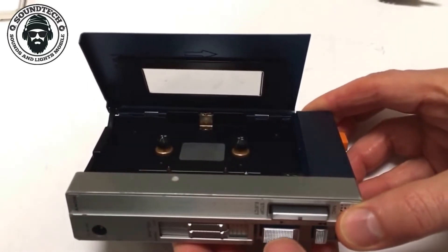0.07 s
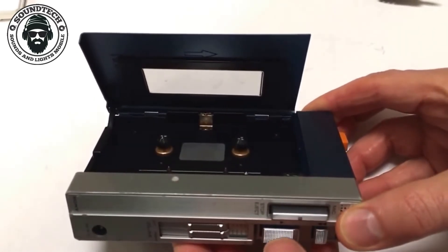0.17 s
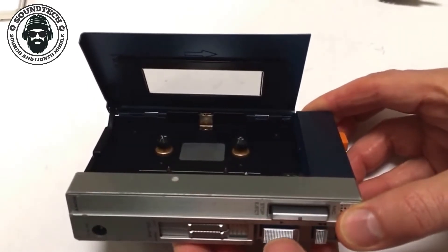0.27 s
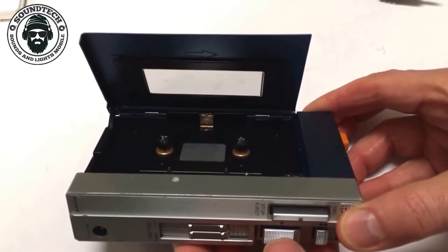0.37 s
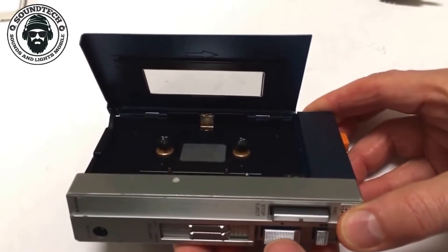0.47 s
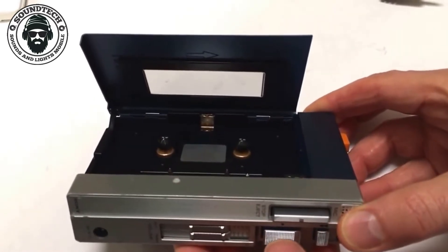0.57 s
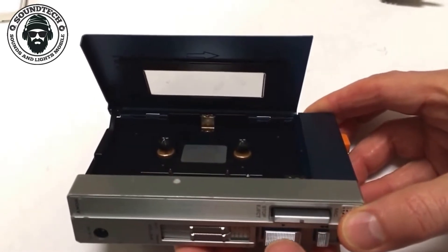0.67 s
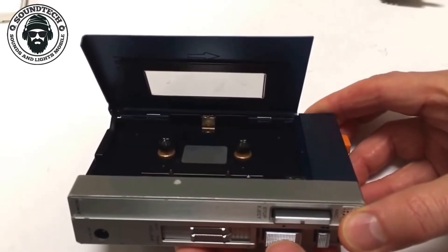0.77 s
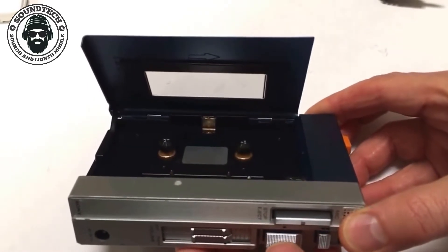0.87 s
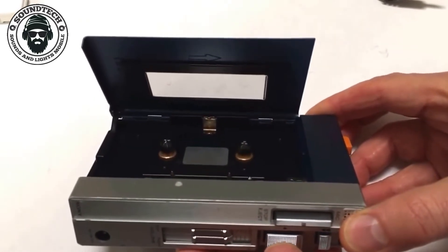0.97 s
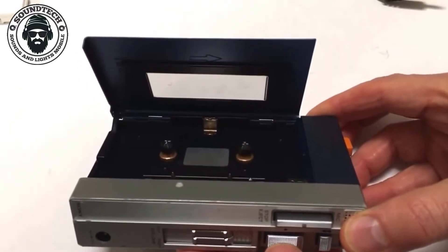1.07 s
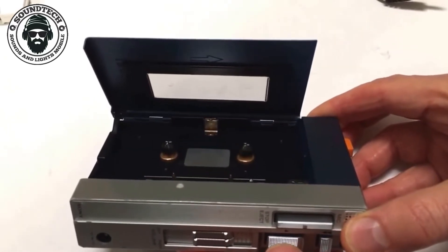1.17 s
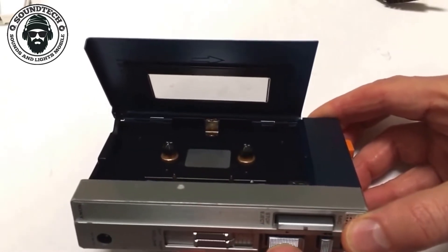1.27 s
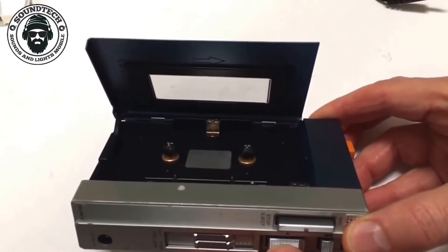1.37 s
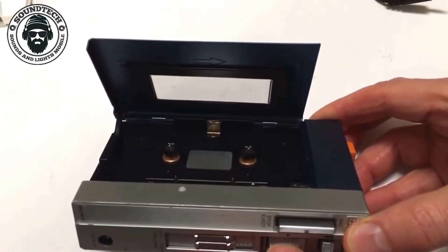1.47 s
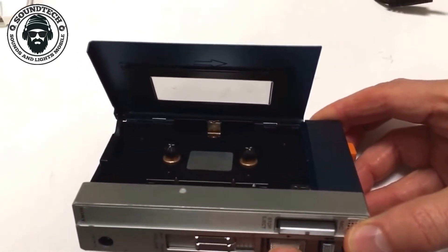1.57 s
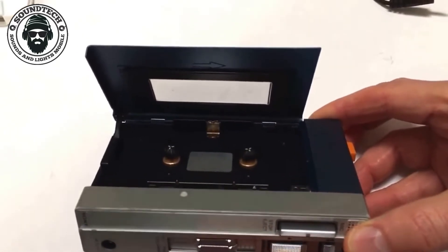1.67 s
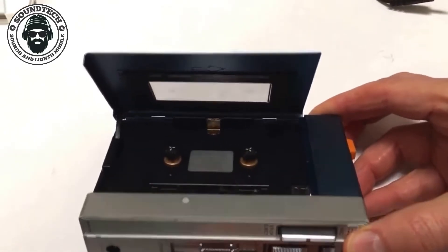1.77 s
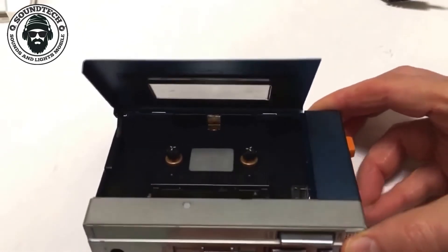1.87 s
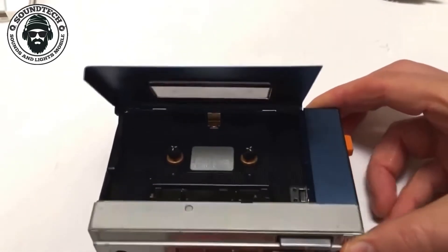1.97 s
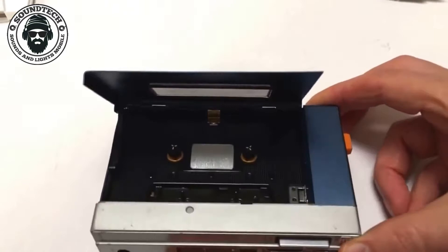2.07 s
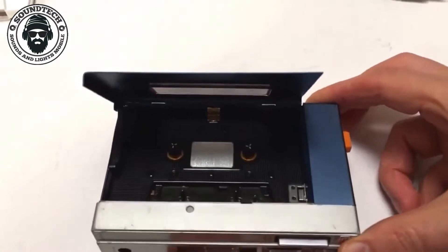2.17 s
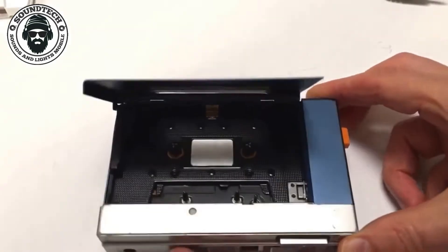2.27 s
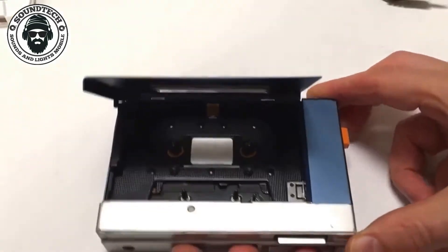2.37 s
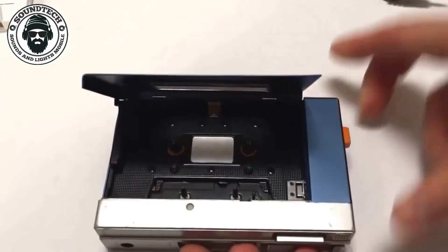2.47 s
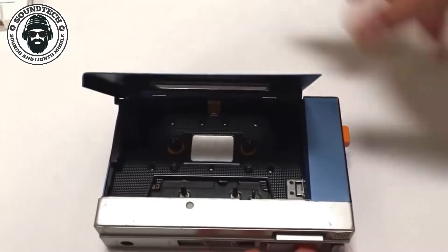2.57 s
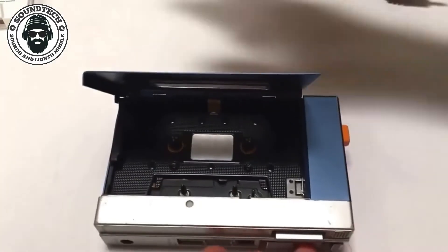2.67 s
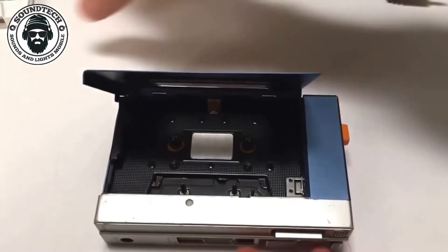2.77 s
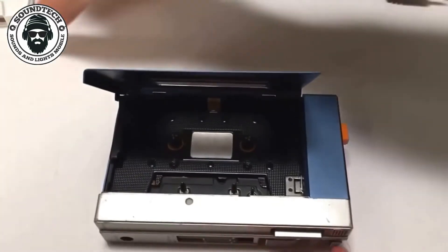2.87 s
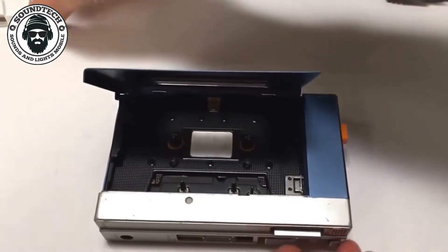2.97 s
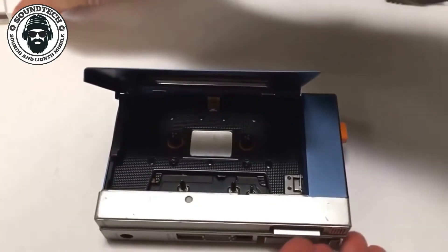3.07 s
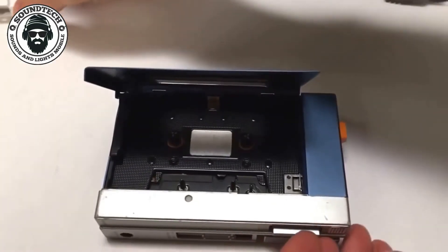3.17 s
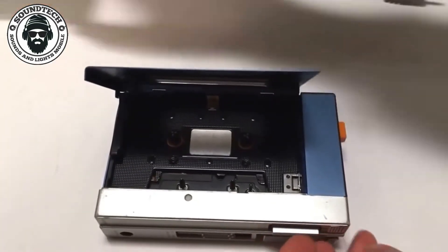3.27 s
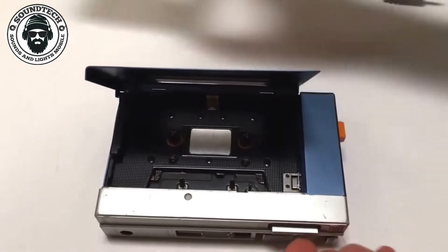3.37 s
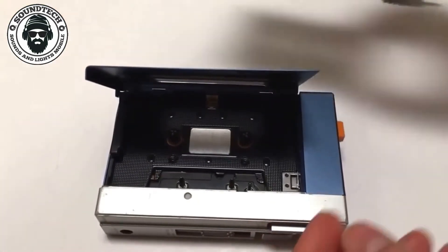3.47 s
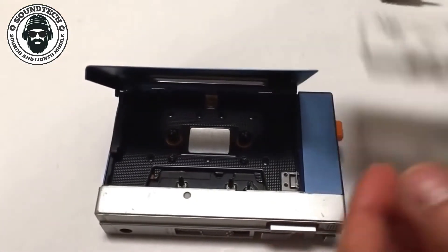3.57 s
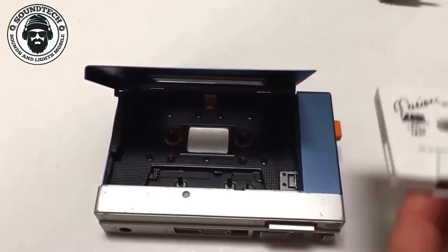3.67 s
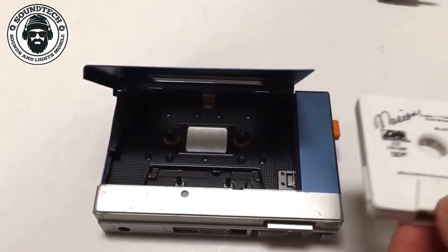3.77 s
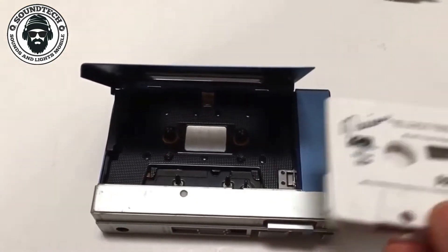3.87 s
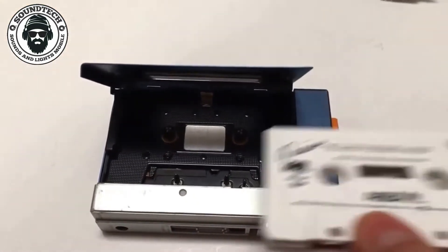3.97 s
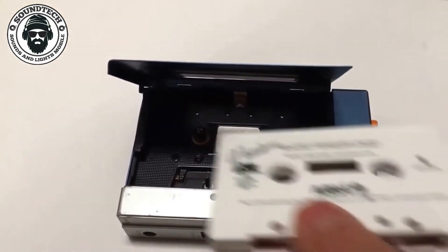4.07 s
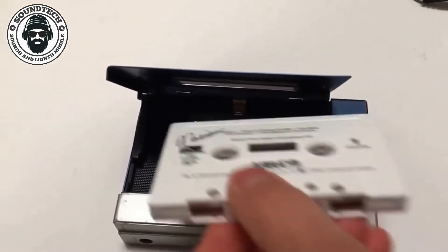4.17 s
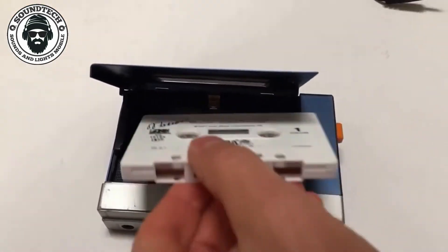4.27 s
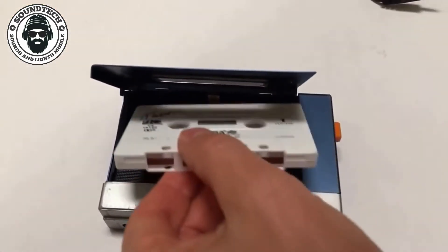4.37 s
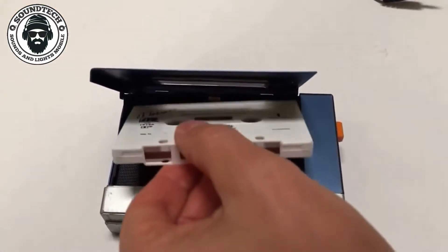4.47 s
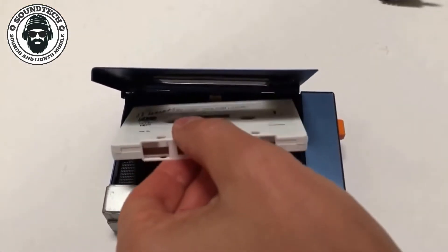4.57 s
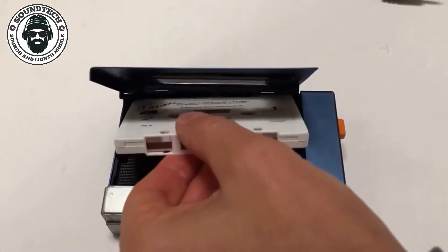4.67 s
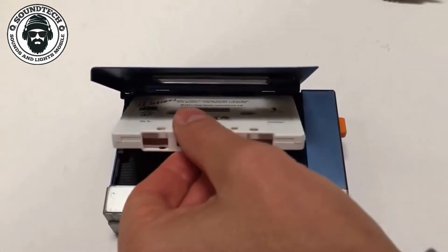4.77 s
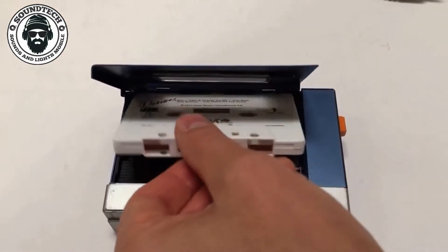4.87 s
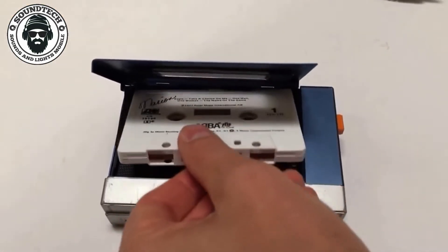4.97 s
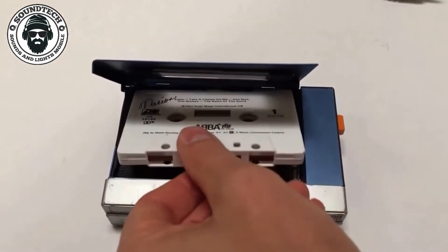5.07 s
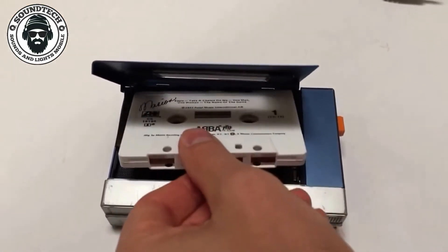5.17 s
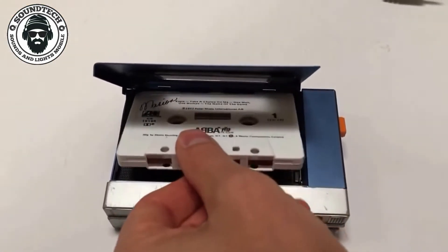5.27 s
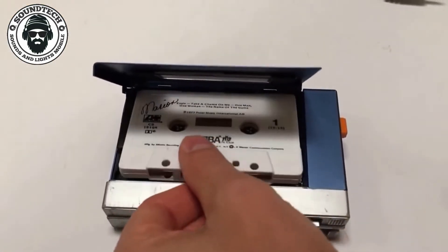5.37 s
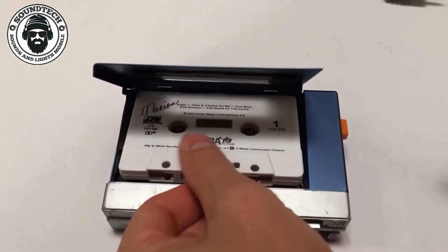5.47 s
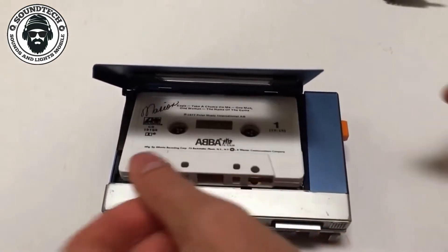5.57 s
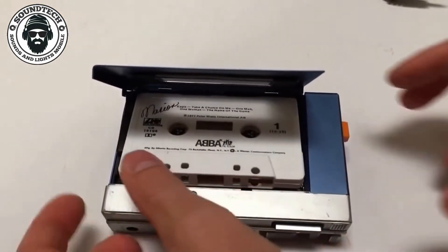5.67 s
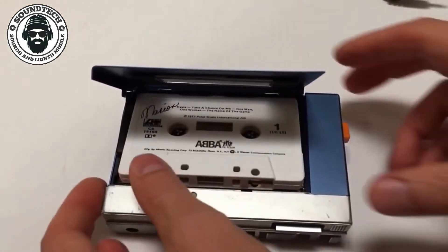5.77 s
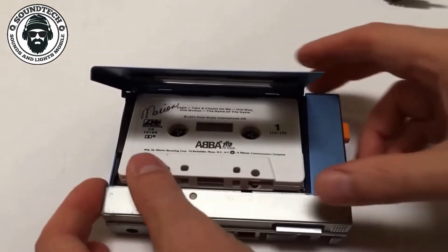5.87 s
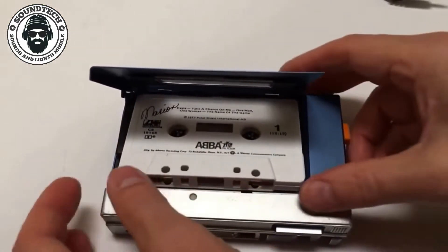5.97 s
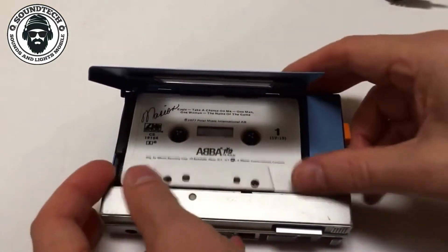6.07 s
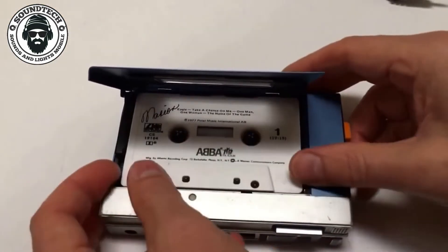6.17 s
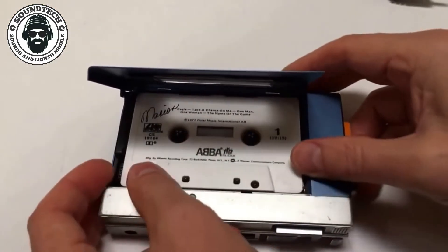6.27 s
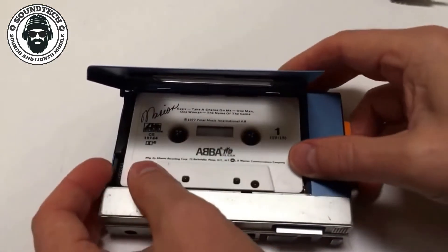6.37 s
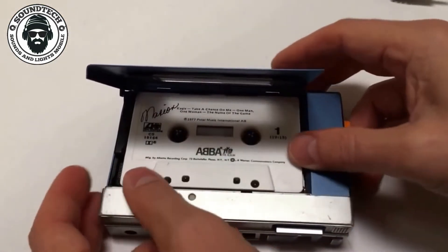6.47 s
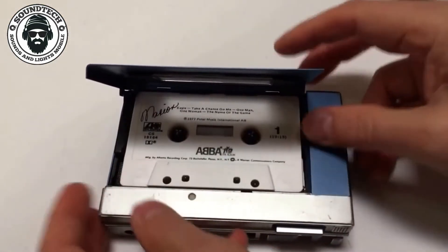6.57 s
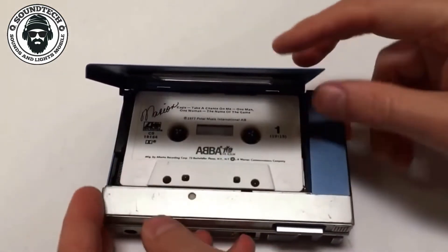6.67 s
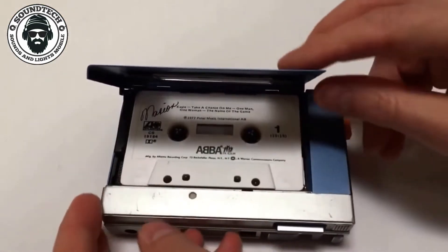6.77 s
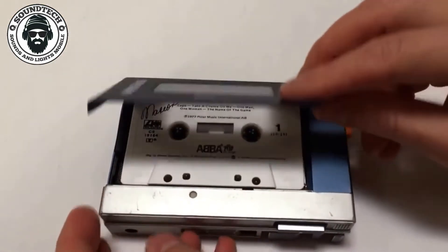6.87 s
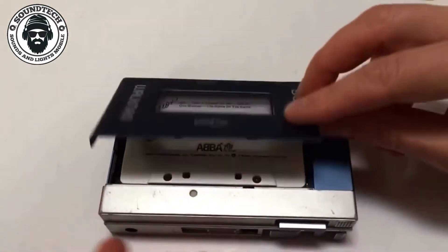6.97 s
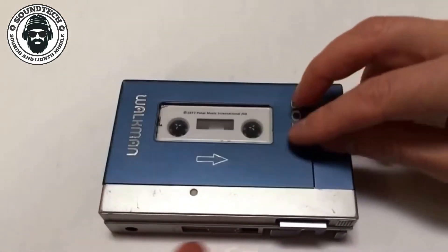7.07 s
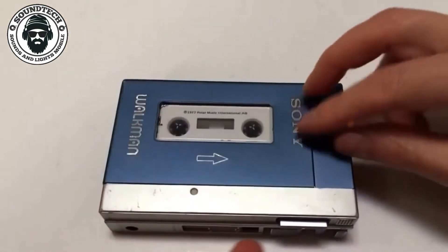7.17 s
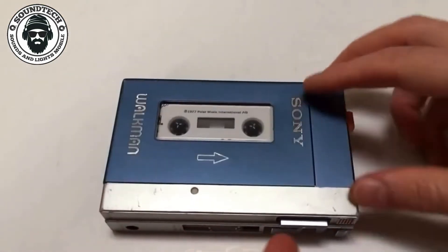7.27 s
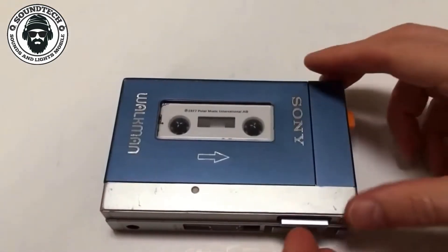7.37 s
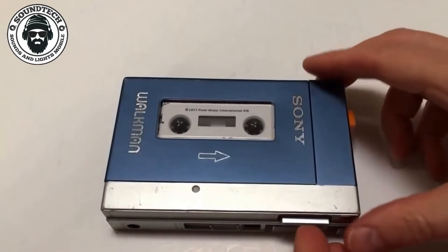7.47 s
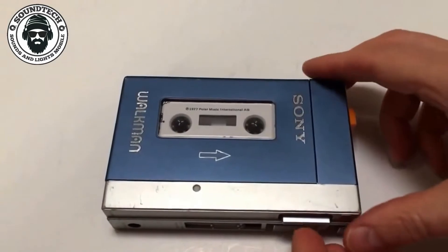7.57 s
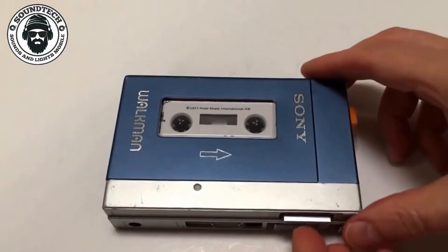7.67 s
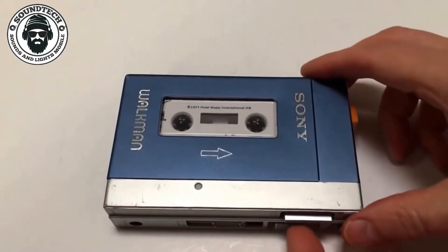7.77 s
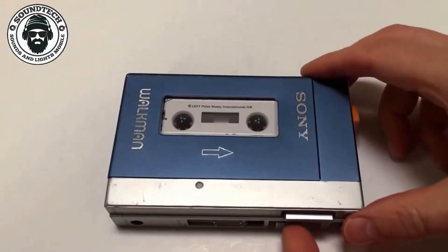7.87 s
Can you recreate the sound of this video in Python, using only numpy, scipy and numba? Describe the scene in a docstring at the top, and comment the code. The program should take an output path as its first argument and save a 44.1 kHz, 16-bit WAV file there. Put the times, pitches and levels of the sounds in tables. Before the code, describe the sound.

In a small quiet room, close to the microphone, a little cassette motor whirrs faintly, a grainy, buzzing gear tone with a slight fast flutter. At about 1.5 seconds a stop key snaps back, loud and bright, and the whirr ceases at once. Soft finger rubs and low bumps follow, then a firm plastic knock at 2.3 as the player is set down. Small thumps and faint rustles come around 3, then near quiet until 4. From 4.35 to 4.9 a cassette clacks and rattles hollowly into the bay; at 5.4 a tight burst of crisp clicks seats it. A short scrape leads to a loud press click at 6.1, with a lesser one at 6.5. The lid shuts at 7.1 with the strongest late snap and a short room echo. Faint rubs and taps finish over soft rumble and hiss.

```python
"""A small room, with a portable cassette player on a table close to one microphone. Its motor whirrs until the
stop key snaps back; it is set down, a cassette is slid in and pressed home, and the lid is shut.
The whirr is gear ticks and brush noise ringing the chassis. Every click is a short chatter of contacts that
rings the shell and stirs the room. Grainy noise makes the fingers rubbing on plastic; soft rumble and
hiss lie under it all."""
import sys
import numpy as np
from scipy import signal
from scipy.io import wavfile
from scipy.ndimage import uniform_filter1d
from numba import njit

SR = 44100
rng = np.random.default_rng(int(sys.argv[2]) if len(sys.argv) > 2 else 0)


def transcribe(u):
    """Save the signal u as a 16-bit wav file named by the first command-line argument.

    u: samples, shape (n,) or (channels, n), limited to [-1, 1]; the rate is SR.
    q: integer samples, one column per channel.
    """
    v = np.clip(np.atleast_2d(u).T, -1, 1)
    q = np.round(v * 32767).astype(np.int16)
    wavfile.write(sys.argv[1], SR, q)


N = 349272

# Clicks: t/s, peak before the echo/dB, thud (how much it shakes the table)/dB, snap (how hard the contact is)/dB,
# low pitch of the struck part f/Hz, its high pitch f/Hz, chatter length/ms
CLICKS = [(1.467, -4.5, -15, 5, 1736, 8030, 6.5), (1.472, -16, -10.5, -1.5, 1940, 8530, 3.8),
          (1.656, -41, -4, -3.5, 1680, 6280, 12), (1.678, -25.5, -21.5, -7, 1650, 4240, 7),
          (1.763, -47, 22, -7, 996, 3410, 15), (1.965, -50, 11, -5, 1450, 3520, 5.6),
          (2.013, -41, 37, -3, 1460, 3290, 5.3), (2.034, -42.5, 26, -9, 1460, 7170, 5.3),
          (2.052, -47, 6, -6, 1220, 6610, 20), (2.083, -39.5, 0, -6, 1250, 3590, 1.6),
          (2.284, -29.5, 0, -5, 1180, 3740, 11), (2.291, -15, 14.5, 0, 1190, 4130, 5.7),
          (2.325, -21.5, 1.5, -5.5, 897, 3200, 4.5), (2.351, -33, -10, 7, 970, 4130, 11),
          (2.368, -41.5, 2, -3, 956, 3610, 12), (2.437, -39, 8, 8, 1950, 4190, 2.8),
          (2.446, -37, -5, -4, 2090, 3360, 7.5), (2.8, -43, -23, -5.5, 1690, 3620, 11.4),
          (2.935, -50.5, 6, -7, 1190, 3950, 12), (2.996, -43.5, 22, -9, 1710, 3820, 9.6),
          (3.027, -32.5, 35, 7, 1030, 3680, 7.7), (3.044, -39, 14, -3, 1310, 4030, 19),
          (3.09, -43.5, 19, 1, 1710, 3330, 5.4), (3.115, -39, 16, 12, 885, 6550, 3),
          (3.124, -35.5, -16, -5.5, 1500, 4130, 7), (3.224, -40.5, 6, 2, 1880, 3410, 8),
          (3.237, -36, -4.5, -5, 1300, 4240, 10.5), (3.255, -47, 7, 2, 1350, 2980, 10),
          (3.269, -45, -12, -5, 1640, 3940, 8), (3.581, -43, 2, 25, 1070, 5100, 6.7),
          (3.692, -45.5, -11, -33, 1470, 6870, 13), (3.974, -46, 5, 7.5, 936, 5840, 5.4),
          (4.115, -42, -14, -23, 1474, 3660, 20), (4.248, -39.5, -13, -14, 1540, 4600, 8.8),
          (4.353, -18.5, -1, 2, 1210, 3680, 7.5), (4.429, -26, -4, -7.5, 870, 3430, 9),
          (4.547, -40.5, -1, -10, 915, 5230, 8.8), (4.567, -21.5, -14, -8.5, 1870, 3710, 6.3),
          (4.586, -31.5, -5, -10, 1280, 4210, 22), (4.673, -32, -18, -16, 1430, 5580, 8.1),
          (4.686, -35, -6, -15, 1500, 4470, 13), (4.7, -18, -17.5, -10, 1660, 5560, 7.8),
          (4.741, -39.5, 18, 6, 1700, 5530, 4.3), (4.894, -42.5, -4, -5, 1420, 4390, 7.7),
          (4.906, -27.5, -15.5, -13, 1570, 3770, 5.6), (4.945, -36.5, -12.5, -6.5, 1490, 5570, 4.5),
          (5.018, -36, -4, -2, 1000, 4330, 5.1), (5.159, -48, -11, -12.5, 1686, 4590, 8),
          (5.329, -42.5, -4, -7.5, 1220, 4050, 14), (5.363, -18.5, -17, -3, 1730, 3970, 7.2),
          (5.371, -19.5, -3.5, 12, 2030, 7100, 12), (5.382, -16.5, -4, -8, 1880, 3350, 17),
          (5.392, -14, -8.5, 5.5, 1420, 6360, 8.7), (5.392, -11.5, 8, 11.5, 1340, 6420, 2),
          (5.399, -18.5, -12, 20.5, 1900, 7210, 6.3), (5.754, -51, 12, 6.5, 1430, 9530, 6.8),
          (5.793, -48.5, -7.5, -18, 1240, 3770, 4.1), (5.944, -38.5, -7.5, -10.5, 1740, 4450, 13),
          (5.964, -43.5, 9.5, -15, 920, 7240, 8.4), (6.095, -27, -1, -1, 1510, 5860, 4.2),
          (6.126, -6.5, -5.5, 1.5, 913, 7300, 8.8), (6.446, -48, -1, 0, 1097, 7310, 7.8),
          (6.534, -18, -9.5, -2, 1300, 4410, 4.7), (6.719, -42.5, 22.5, -6.5, 1100, 3590, 7),
          (6.74, -44, 18, -1.5, 957, 4050, 10.3), (6.963, -54.5, 5.5, 14, 970, 9390, 3),
          (6.986, -43.5, 13, 14.5, 980, 9600, 4.1), (7.108, -3, -4.5, -3, 800, 4260, 5),
          (7.116, -15, 3.5, -2, 2040, 3690, 2.8), (7.124, -20.5, -6.5, -1, 905, 3600, 5.9),
          (7.3, -38, 34, 9, 1144, 4330, 8), (7.467, -47, -8, -20, 1560, 4760, 5.4),
          (7.584, -41.5, -1, -4.5, 922, 4780, 8.5), (7.8, -38.5, -10, -6.5, 1660, 4150, 10)]
# Upper edge of each group of modes: f/Hz
GROUP_TOP_HZ = [180, 450, 1200, 2600, 5200, 9400, 15600]
# Modes (ringing tones) of shell, cassette and table top together: f/Hz, relative level/dB, time to die by 60 dB t/s
SHELL_MODES = [(70, 1.5, 0.099), (130, -8, 0.27), (200, -10.5, 0.019), (278, 7, 0.084), (321, 3, 0.085),
               (352, -2.5, 0.12), (417, 0.5, .035), (428.7, 0.5, 0.025), (683.4, -5.5, 0.027),
               (800, 5, 0.0067), (944, -0.5, 0.03), (1198.2, 6.5, 0.017), (1500, 1.5, 0.011),
               (1670, -5.5, 0.011), (1880, -9.5, 0.023), (2040, -9, 0.02), (2850, 0, 0.0033),
               (3490, -2.5, 0.011), (3824, 1.5, 0.015), (4295, -3.5, 0.018), (4740, -13, 0.0012),
               (5820, 0.5, .005), (6580, 6, 0.0035), (7520, 1, 0.0035), (8550, -5.5, 0.015),
               (9060, -3, 0.0056), (9950, -8, 0.0062), (11280, -7, 0.0086), (12170, -10.5, 0.018),
               (14500, -4.5, 0.0028)]
# How each group of modes answers a click: strength level/dB, share of the thud, share of the snap
GROUP_ANSWERS = [(-1.5, 1.2, 0.01), (-1.86, 1.01, 0.01), (1.5, 0.61, 0.01), (-0.3, 0.01, 0.01),
                 (0, 0.011, .85), (-1, 0.01, 1.3), (-7, 0.01, 1.5)]
# What the room returns of a click, per group: energy level/dB, time to die by 60 dB t/s
CLICK_ECHO = [(-15.5, 0.47), (-5, 0.17), (-9, 0.25), (-10, 0.21), (-9, 0.16), (-13.5, 0.2), (-11.5, 0.12)]
# Chassis resonances that the motor rings: f/Hz, nominal width f/Hz (widened in motor), relative level/dB
MOTOR_BODY = [(863.6, 22, -9), (1310, 62, -20), (1680, 75, -4.5), (1967, 37, -2.5), (2106, 30, -7),
              (3320, 110, -12.5), (3860, 350, -9.5), (4170, 170, -6), (4426, 120, -27.5), (5286, 150, -20),
              (5890, 120, -20.5), (6860, 600, -19), (8700, 1100, -23.5), (12100, 1100, -25.5),
              (14000, 3200, -33.5), (978, 19, -10.5), (1450, 420, -14), (10800, 150, -25)]
# Fingers sliding on the player: start t/s, length t/s, table rumble level/dB, scrape level/dB,
# brightness/dB (added once to the scratch, twice to the hiss)
RUBS = [(1.71, 0.12, -53, -63, -12), (1.793, 0.13, -67, -62.5, -0.5), (1.885, 0.15, -75, -66.5, 0),
        (1.966, 0.23, -57.5, -60, -9), (2.15, 0.3, -57, -54.5, -7.5), (2.354, 0.15, -54, -52, -7),
        (2.49, 0.15, -70, -69, -2), (2.713, .26, -75, -70.5, -1), (2.946, 0.18, -66, -60, -12),
        (3.031, 0.15, -60.5, -60.5, -4.5), (3.144, 0.1, -61.5, -60.5, -6), (3.221, 0.076, -56, -55, -5),
        (3.278, 0.11, -75, -76.5, 1), (3.645, .08, -80, -65, -3), (3.71, 0.052, -82, -74.5, 5),
        (3.778, .17, -98, -81.5, 10.5), (3.967, 0.04, -80, -76, 0), (4.169, .025, -86, -86, 5.5),
        (4.34, 0.098, -55, -52, -3.5), (4.445, 0.13, -69, -64, -25), (4.603, 0.1, -56, -66, -8),
        (4.72, 0.13, -64.5, -67.5, -2), (4.814, 0.13, -69, -69, 0.5), (5.28, 0.027, -71, -63, -16),
        (5.333, 0.057, -63, -57.5, -1), (5.589, 0.15, -66.5, -70, -2), (5.694, 0.12, -65.5, -71, 1),
        (5.918, 0.057, -70, -64, -1), (6.028, 0.093, -63, -61, -6), (6.08, 0.054, -59, -41, -1.5),
        (6.368, 0.21, -65, -62, -3.5), (6.544, 0.19, -67.5, -68.5, -6), (6.697, .13, -70.5, -62.5, -11.5),
        (6.953, 0.32, -65, -62, -1), (7.293, 0.17, -69, -63.5, -3), (7.406, 0.13, -64.5, -64.5, -3.5),
        (7.518, 0.087, -64, -75, -6), (7.723, 0.25, -67, -69, -3.5)]
# Shape of the background noise: f/Hz, relative level per Hz/dB
AIR_SHAPE = [(15, -36), (25, 2.5), (130, 1), (190, -12), (301, -11.5), (489, -24), (1230, -21.5),
             (1370, -20.5), (1560, -32), (1740, -24.5), (2690, -31), (3430, -31), (5570, -32.5),
             (14400, -36.5), (16000, -44)]
# Room tail of the steady sounds: f/Hz, time to die by 60 dB t/s
ROOM_TAIL = [(200, 0.28), (800, 0.86), (2500, 0.43), (6000, 0.32), (13000, 0.058)]

# Motor: tooth rate, level before the throb, moment it is silent, fade length
MESH_HZ, MOTOR_DB, STOP_S, STOP_FADE_S = 423.3, -54.5, 1.485, 0.0071
# The gear runs out of round: force throbs twice a turn, speed wobbles once (as a share)
SHAFT_HZ, SHAFT_THROB_DB, SHAFT_WOBBLE = 16.2, 0.94, 0.011
ROOM_DB, ROOM_GAP_S, AIR_DB = -11, 0.00057, -60
# Modes near the pitches of the struck part ring up to this much louder
SPOT_DB, SPOT_OCTAVES = 22, 0.079
CONTACT_SCATTER_DB, MODE_SCATTER_DB, MODE_SCATTER_PITCH = 3.5, 2.0, 0.02
# Once in, the hollow cassette favours modes near its pitch; light cassette and lid hardly stir the deepest modes
CASSETTE_IN_S, CASSETTE_HZ, CASSETTE_OCTAVES, CASSETTE_DB = 4.0, 410, 0.22, 14.5
LIGHT_DEEP_DB = -12.5
# The struck part's own pitches stand out of the echo by LINGER_HZ / pitch
LINGER_HZ, LINGER_Q = 4200, 20
# The next room hands back a weaker, slower tail
LATE_DB, LATE_STRETCH = -12.5, 3.4
RUB_RISE_SHARE, RUB_FALL_SHARE = 0.5, 0.45  # shares of each slide's length
SCRATCH_DB, HISS_DB = -1.5, 0.5  # nail scratch and skin hiss against the scrape
# The echo off the table cancels part of this band at the microphone
DIP_HZ, DIP_WIDTH_HZ, DIP_SHARE = 2592, 610, 0.26
TOP_HZ = 15700


def undb(db):
    """Turn decibels into a plain gain."""
    return 10 ** (np.asarray(db) / 20)


def level(x, db):
    """Scale to an rms (average) level in dB."""
    return x * undb(db) / np.sqrt(np.mean(x ** 2))


@njit
def svf(x, hz, width):
    """State-variable band-pass (width in Hz), gain 1 at the centre."""
    y = np.empty(len(x))
    band_state, low_state = 0., 0.
    g, k = np.tan(np.pi * hz / SR), width / hz
    for i in range(len(x)):
        v = (band_state + g * (x[i] - low_state)) / (1 + g * (g + k))
        band_state = 2 * v - band_state
        low_state = low_state + 2 * g * v
        y[i] = k * v
    return y


def band(x, lo_hz, hi_hz):
    """Band-pass between two edges."""
    return signal.sosfilt(signal.butter(2, [lo_hz, hi_hz], "band", fs=SR, output="sos"), x)


def walk(rate):
    """Random levels held 1 / rate s and smoothed twice; spread near 1."""
    hold = int(SR / rate)
    steps = np.repeat(rng.standard_normal(N // hold + 1), hold)
    return 1.2 * uniform_filter1d(uniform_filter1d(steps, hold), hold)[:N]


def nearness(hz, centre_hz, octaves):
    """Bell curve over pitch: 1 at the centre, fading over some octaves."""
    return np.exp(-(np.log2(hz / centre_hz) / octaves) ** 2)


def decay(t, t60):
    """Ringing loses 60 dB in t60 seconds."""
    return 1000. ** (-t / t60)


def motor():
    """Gear teeth mesh with wavering speed and force; their ticks and brush noise ring the chassis."""
    shaft = 2 * np.pi * np.cumsum(SHAFT_HZ * (1 + .04 * walk(8))) / SR
    waver = .011 * walk(10) + .016 * walk(50) + .03 * walk(400)
    teeth_passed = np.cumsum(MESH_HZ * (1 + SHAFT_WOBBLE * np.sin(shaft) + waver)) / SR
    # one tick of uneven force each time a tooth passes
    ticks = np.diff(np.floor(teeth_passed), prepend=0) * undb(3.0 * rng.standard_normal(N))
    ticks = level(ticks - ticks.mean(), 0)
    body = 0
    for hz, width, db in MOTOR_BODY:
        drive = ticks + level(rng.standard_normal(N), -0.5)  # ticks plus brush noise
        once = svf(drive, 1. * hz, 1.9 * width)
        body = body + undb(db) * svf(once, 1. * hz, 1.9 * width)
    throb_db = SHAFT_THROB_DB * np.sin(2 * shaft)
    running = np.clip((STOP_S - np.arange(N) / SR) / STOP_FADE_S, 0, 1)
    return level(body, 0) * undb(MOTOR_DB + throb_db + 0.77 * walk(18)) * running


def room(x):
    """Diffuse tail of the steady sounds after a short gap, dying at its own pace in each band."""
    t = np.arange(SR // 2) / SR
    tail = 0
    for hz, t60 in ROOM_TAIL:
        tail = tail + svf(rng.standard_normal(len(t)), 1. * hz, 1. * hz) * decay(t, t60)
    tail = tail * np.clip(t / ROOM_GAP_S - 1, 0, 1)
    return undb(ROOM_DB) * signal.fftconvolve(x, tail / np.sqrt(np.sum(tail ** 2)))[:N]


def air():
    """Low house rumble and microphone hiss, in bands that each flicker on their own."""
    noise = 0
    shape_hz, shape_db = np.transpose(AIR_SHAPE)
    for hz in 30 * 2 ** np.arange(0, 9.2, 1 / 3):
        db = np.interp(np.log(hz), np.log(shape_hz), shape_db) + 1.0 * walk(11)
        narrow = svf(svf(rng.standard_normal(N), hz, hz / 3), hz, hz / 3)
        noise = noise + undb(db) * narrow
    return level(noise, AIR_DB)


def diffuse_noise(lo_hz, hi_hz):
    """Noise coloured by the shell modes of one group: raw material for the echo of clicks."""
    noise = 0
    for hz, db, _ in SHELL_MODES:
        if lo_hz < hz <= hi_hz:
            noise = noise + undb(db) * svf(rng.standard_normal(4 * SR), 1. * hz, hz / 3.4)
    return band(noise, lo_hz, hi_hz)


def clicks():
    """Each click is a swelling, dying swarm of tiny contacts; where it lands decides which modes ring."""
    out, swarm, tail = np.zeros(N + SR), 1024, SR // 2  # swarm and echo tail lengths in samples
    t, late = np.arange(6000) / SR, np.arange(tail) / SR
    hz, db, t60 = (column[:, None] for column in np.transpose(SHELL_MODES))
    group = np.searchsorted(GROUP_TOP_HZ, hz[:, 0])
    edges = list(zip([40] + GROUP_TOP_HZ, GROUP_TOP_HZ))
    diffuse = [diffuse_noise(lo, hi) for lo, hi in edges]
    flutter = undb(1.0 * walk(120))  # uneven level, as if single wall echoes stood out of the wash
    fill = np.clip(late / ROOM_GAP_S - 1, 0, 1)

    for s, peak_db, thud_db, snap_db, low_hz, high_hz, ms in CLICKS:
        part_pitches = (low_hz, high_hz)
        cassette_in = s > CASSETTE_IN_S
        hits = rng.standard_normal(swarm) * undb(CONTACT_SCATTER_DB * rng.standard_normal(swarm))
        u = t[:swarm] / (ms / 6000)  # sixths of the chatter length
        swell = u ** 2 * np.exp(-u)

        near_db = SPOT_DB * sum(nearness(hz, p, SPOT_OCTAVES) for p in part_pitches)
        near_db = near_db + CASSETTE_DB * nearness(hz, CASSETTE_HZ, CASSETTE_OCTAVES) * cassette_in
        mode_db = db + near_db + MODE_SCATTER_DB * rng.standard_normal(hz.shape)
        mode_hz = hz * (1 + MODE_SCATTER_PITCH * rng.standard_normal(hz.shape))
        modes = undb(mode_db) * np.sin(2 * np.pi * mode_hz * t) * decay(t, t60)

        # every spot on the player stirs the room in its own way
        spot = rng.integers(0, 3 * SR)
        room_shape = fill * flutter[spot:spot + tail]
        click = echo = 0
        for k, (base_db, thud_share, snap_share) in enumerate(GROUP_ANSWERS):
            strength_db = base_db + thud_share * thud_db + snap_share * snap_db
            strength_db += LIGHT_DEEP_DB * (k == 0 and cassette_in)
            # big slow modes feel the swarm as one push, small quick ones feel every contact
            push = (np.abs(hits) if k < 2 else hits) * swell
            ring = signal.fftconvolve(modes[group == k].sum(axis=0), push)
            ring = band(ring, *edges[k])  # small parts radiate little below their own pitch
            click = click + undb(strength_db) * ring / np.sqrt(np.sum(ring ** 2))

            echo_db, echo_t60 = CLICK_ECHO[k]
            wash = diffuse[k][spot:spot + tail]
            lingering = sum(LINGER_HZ / p * svf(wash, 1. * p, p / LINGER_Q) for p in part_pitches)
            fading = decay(late, echo_t60) + undb(LATE_DB) * decay(late, echo_t60 * LATE_STRETCH)
            wash = (wash + lingering) * room_shape * fading
            echo = echo + undb(strength_db + echo_db) * wash / np.sqrt(np.sum(wash ** 2))
        i, gain = int(s * SR), undb(peak_db) / np.abs(click).max()
        out[i:i + len(click)] += gain * click
        out[i:i + tail] += gain * echo
    return out[:N]


def hands():
    """Stick-slip grains of skin on plastic shake the table, ring the shell and hiss; slides swell and ease off."""
    grains = rng.standard_normal(N) * undb(2.2 * walk(220) + 1.2 * walk(30))
    scrape = sum(undb(db) * svf(grains, 1. * hz, hz / 6) for hz, db, _ in SHELL_MODES if 600 < hz < 2600)
    rumble, scratch, hiss = band(grains, 150, 450), band(grains, 1500, 6000), band(grains, 2800, 15000)
    layers = [rumble, scrape, scratch, hiss]
    pressure = np.zeros((len(layers), N))
    for s, length, rumble_db, scrape_db, bright_db in RUBS:
        i = int(s * SR)
        u = np.arange(min(int(length * SR), N - i)) / (length * SR)  # progress of the slide, 0 to 1
        ramp = np.clip(np.minimum(u / RUB_RISE_SHARE, (1 - u) / RUB_FALL_SHARE), 0, 1)
        swell = np.sin(np.pi / 2 * ramp) ** 2
        scratch_db = scrape_db + bright_db + SCRATCH_DB
        hiss_db = scrape_db + 2 * bright_db + HISS_DB
        layer_db = [rumble_db, scrape_db, scratch_db, hiss_db]
        pressure[:, i:i + len(u)] += undb(layer_db)[:, None] * swell
    return sum(p * level(x, 0) for p, x in zip(pressure, layers))


def scene():
    """Add the steady sounds and their room tail, the air and the clicks, which bring their own echo."""
    steady = motor() + hands()
    return (steady + room(steady) + air() + clicks())[None, :]


def record(dry):
    """The table echo dips one band; the microphone drops the deepest bass and the recorder cuts the top."""
    dipped = dry - DIP_SHARE * svf(dry[0], 1. * DIP_HZ, 1. * DIP_WIDTH_HZ)
    low_cut = signal.sosfilt(signal.butter(2, 45, "high", fs=SR, output="sos"), dipped)
    return signal.sosfilt(signal.ellip(8, .2, 70, TOP_HZ, fs=SR, output="sos"), low_cut)


dry = scene()
out = record(dry)
transcribe(out)
```